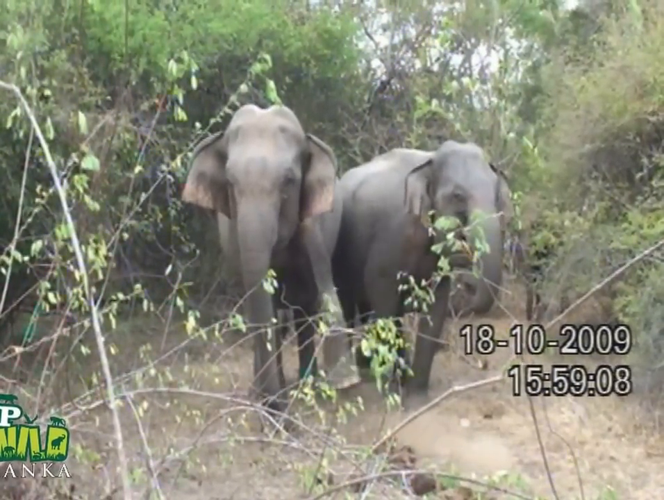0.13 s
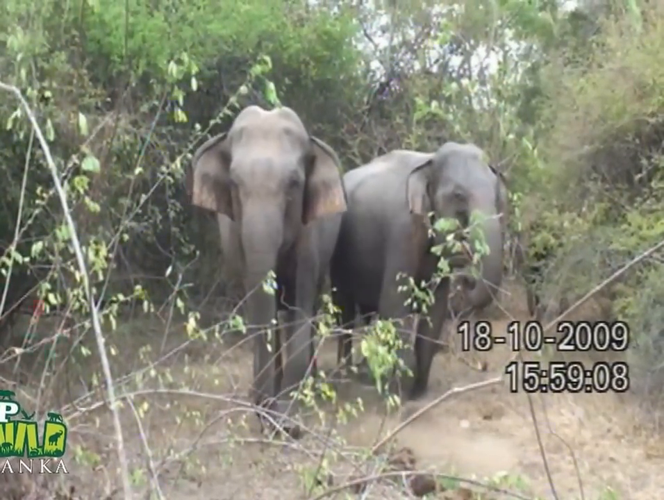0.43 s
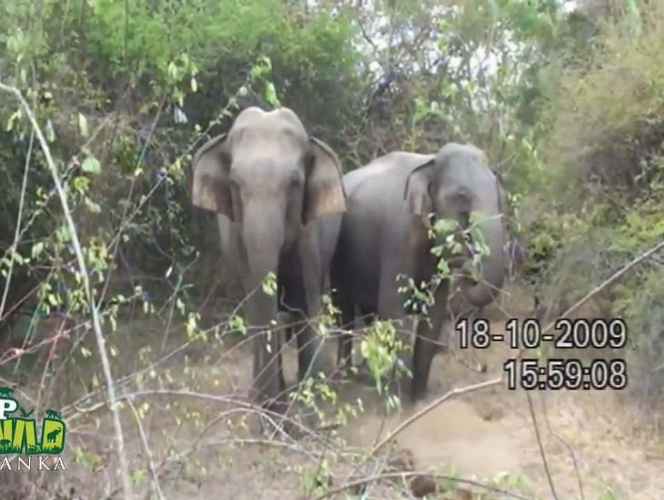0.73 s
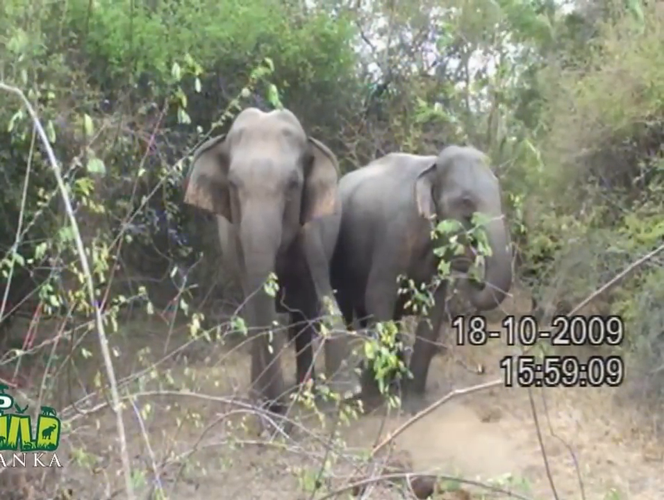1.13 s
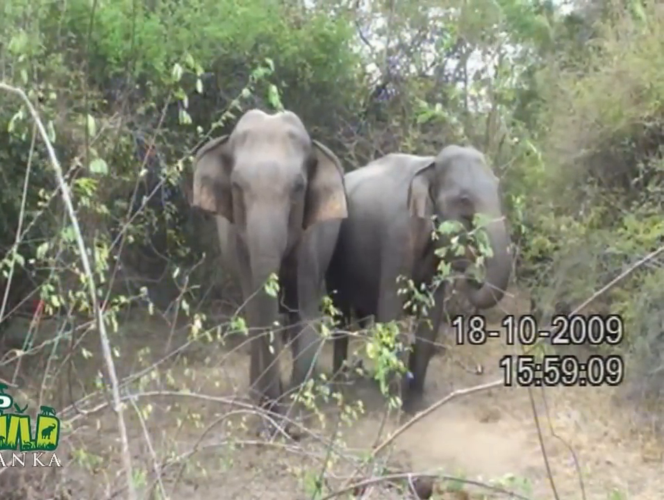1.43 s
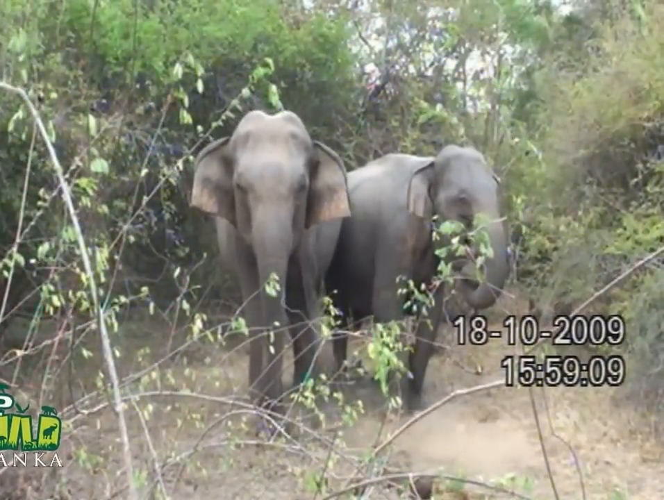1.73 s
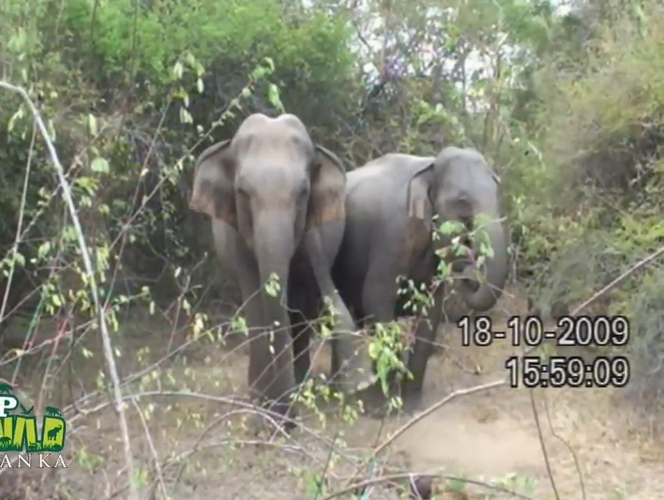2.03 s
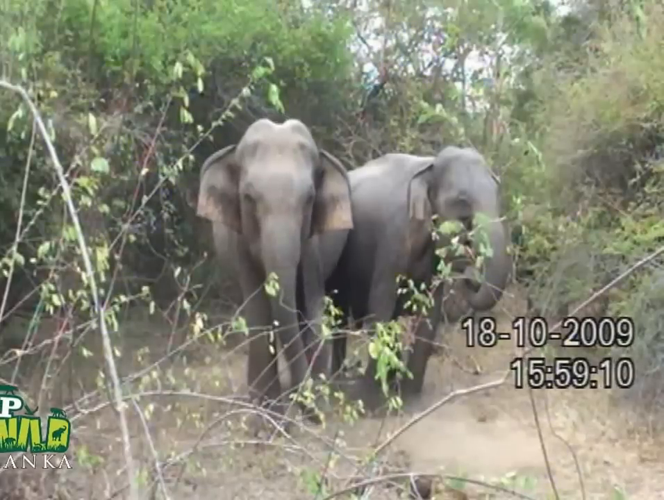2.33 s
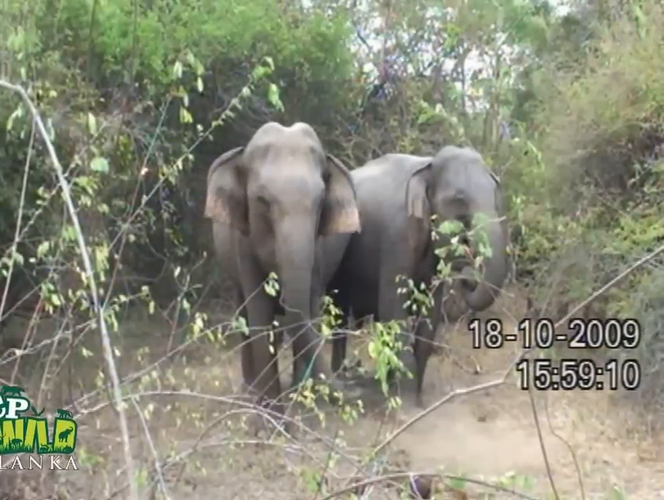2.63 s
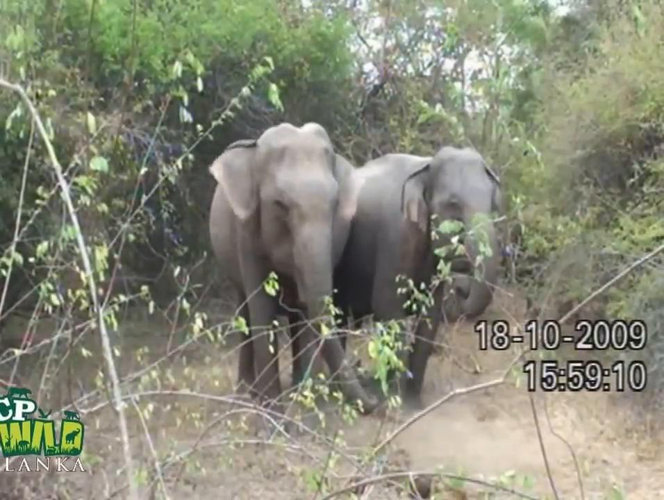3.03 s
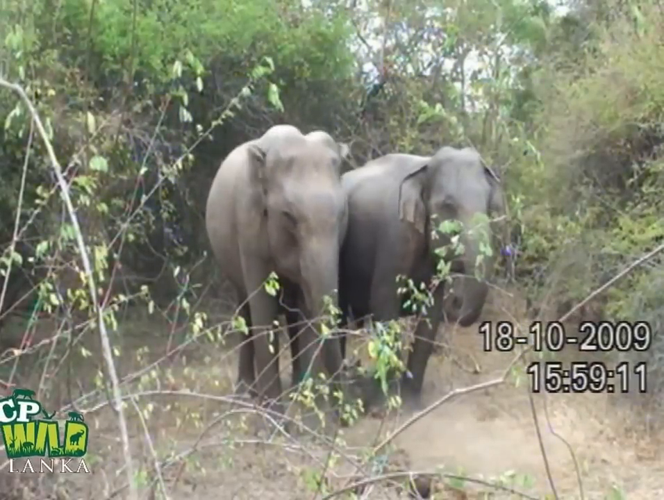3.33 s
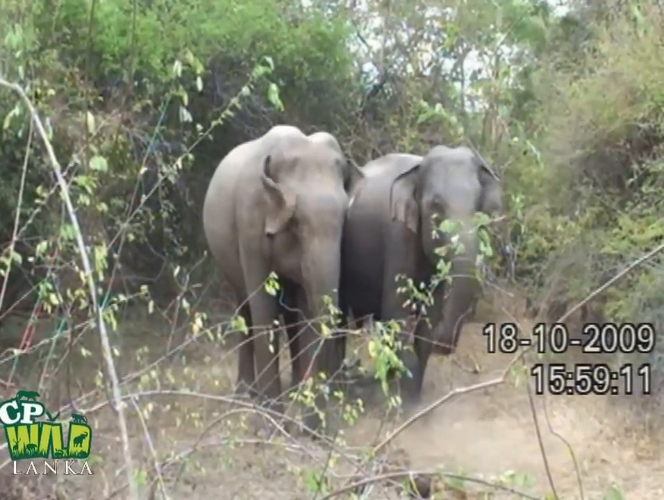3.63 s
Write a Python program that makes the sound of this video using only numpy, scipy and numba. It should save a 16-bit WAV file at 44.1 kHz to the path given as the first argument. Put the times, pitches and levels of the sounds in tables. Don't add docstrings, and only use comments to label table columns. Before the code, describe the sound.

An elephant is already roaring at the start, sliding briefly down in pitch, then locking into a clear, brassy, mid-pitched note at about 0.2-0.6 s. It roughens and wavers until 2 s, then becomes a throaty, rasping, crackling bellow. A faint note returns, peaking near 3.35 s, before sinking into a low, raspy groan to the end. Close, dry outdoor camcorder sound, with faint wind hiss and a barely audible companion's rumble.

```python
import sys
import numpy as np
from scipy import signal
from scipy.fft import rfft, irfft
from scipy.io import wavfile
from scipy.ndimage import uniform_filter1d
from numba import njit

SR = 44100
rng = np.random.default_rng(int(sys.argv[2]) if len(sys.argv) > 2 else 0)


def generate_wav(sig):
    pcm = np.round(np.clip(np.atleast_2d(sig).T, -1, 1) * 32767).astype(np.int16)
    wavfile.write(sys.argv[1], SR, pcm)


def gain_from_decibels(decibels):
    exponent = np.asarray(decibels, float) / 20
    return 10 ** exponent


N = 166257
T = np.arange(N) / SR
BINS_HZ = np.maximum(np.arange(N // 2 + 1) * SR / N, 10)


def curve(table):
    rows = np.array(table, float)
    return [np.interp(T, rows[:, 0], column) for column in rows.T[1:]]


def spectrum(table):
    rows = np.array(table, float)
    return [np.interp(np.log(BINS_HZ), np.log(rows[:, 0]), column) for column in rows.T[1:]]


def unit(x):
    return x / np.sqrt(np.mean(x ** 2))


def smooth_power(x, seconds):
    return np.sqrt(uniform_filter1d(x, int(seconds * SR)) + 1e-9)


@njit
def moving_bandpass(x, hz, width):
    y, band, low = np.empty(len(x)), 0., 0.
    for i in range(len(x)):
        g = np.tan(np.pi * hz[i] / SR)
        k = width / hz[i]
        v = (band + g * (x[i] - low)) / (1 + g * (g + k))
        band, low, y[i] = 2 * v - band, low + 2 * g * v, k * v
    return y


def ring(x, hz, width_hz):
    hz = hz * np.ones(N)
    once = moving_bandpass(x, hz, 1.65 * width_hz)
    return moving_bandpass(once, hz, 1.65 * width_hz)


def walk(rate_hz):
    k = max(int(SR / rate_hz), 2)
    x = uniform_filter1d(uniform_filter1d(rng.standard_normal(N), k), k)
    return unit(x - uniform_filter1d(x, 4 * k))


def tone(hz, db, orders, rough, strain=0):
    phase = 2 * np.pi * np.cumsum(hz * (1 + 0.059 * rough * walk(55.4))) / SR
    shake = np.maximum(1 + rough * walk(40), 0) / np.sqrt(1 + rough ** 2)
    stack = 0
    for k, partial_db in orders:
        wander_db = 2 * walk(21) * (k != 1)
        strain_db = strain * (k > 2) * db
        stack = stack + gain_from_decibels(partial_db + wander_db + strain_db) * np.sin(k * phase + k)
    return np.sqrt(2) * gain_from_decibels(db) * shake * stack


# frequency in Hz, level in dB.
SCRUB_COLOUR = [(25, -28), (60, -21.5), (120, -19.5), (1000, -8), (5000, -15), (13000, -22)]


def scrub():
    colour = gain_from_decibels(spectrum(SCRUB_COLOUR)[0])
    noise = rfft(rng.standard_normal((2, N))) * colour
    mid = irfft(noise[0], N)
    side = irfft(noise[1] / (1 + BINS_HZ / 3000), N)
    gust_db = 1.0 * walk(20)
    return gain_from_decibels(-46 + gust_db) * unit(mid + 0.2 * side * np.array([[1], [-1]]))


# time in seconds, pitch of the third partial in Hz, level in dB.
RUMBLE = [(0.0, 75.2, -26.5), (0.02, 70.7, -48), (0.46, 73.5, -50.5), (0.81, 85.4, -52.5),
          (1.23, 82.36, -51.5), (1.54, 79.8, -53), (1.86, 81.8, -51), (2.18, 67, -52.5), (2.5, 73.4, -44),
          (2.88, 72.3, -45.5), (3.14, 82.7, -39), (3.33, 78, -43.5), (3.71, 75.1, -43.5),
          (3.77, 84.3, -53.5)]
# multiple of the pitch, level in dB.
RUMBLE_PARTIALS = [(1, -18), (2, -7), (3, 1), (4, -19), (5, -20.5)]


def companion_rumble():
    third_hz, db = curve(RUMBLE)
    return tone(third_hz / 3, db, RUMBLE_PARTIALS, 0.05)


# time in seconds, pitch in Hz, level in dB.
SLIDE = [
    (0, 420, -16.5),
    (.03, 385, -20),
    (.09, 350, -17),
    (.12, 340, -44.5),
    (.15, 340, -70.5),
]


def slack_slide():
    return tone(*curve(SLIDE), [(1, 0)], 0.15)


# time in seconds, pitch in Hz, level in dB.
LATE_NOTE = [
    (2.6, 400, -60),
    (2.75, 400, -26),
    (2.97, 405, -25.5),
    (3.05, 402.2, -26),
    (3.17, 415, -18.5),
    (3.31, 436.3, -15),
    (3.37, 418, -11),
    (3.43, 404, -25),
    (3.62, 394, -44.5),
]


def late_note():
    return tone(*curve(LATE_NOTE), [(1, -2.5)], 0.3)


# time in seconds, pitch in Hz, level in dB.
GROAN = [
    (3.32, 214, -40),
    (3.35, 213, -14),
    (3.42, 200, -16),
    (3.61, 186, -16),
    (3.63, 150, -30),
    (3.67, 140, -24),
    (3.72, 160, -22),
    (3.77, 168, -21),
]
# multiple of the pitch, level in dB.
GROAN_PARTIALS = [(1, -5.5), (2, -14), (2.85, -11.5)]


def groan():
    return tone(*curve(GROAN), GROAN_PARTIALS, 0.12)


# time in seconds, pitch in Hz, level in dB.
NOTE = [(0, 404, -17.5), (.08, 420.2, -9), (.19, 413.3, -13), (.22, 422.2, -4), (.35, 423.4, -5),
        (.5, 429.5, -3), (.62, 426.7, -8.5), (.68, 416.8, -9.5), (.9, 416, -11), (.96, 404, -18.5),
        (1.2, 399.6, -22.5), (1.36, 410.2, -15.5), (1.49, 409, -8.5), (1.54, 401.2, -29),
        (1.66, 400, -10.5), (1.76, 394, -25.5), (1.93, 400, -19.5), (2.0, 388.6, -18.5)]
# time in seconds, roughness from 0 to 1.
NOTE_ROUGHNESS = [
    (0, .35),
    (.19, .35),
    (.22, .07),
    (.5, .07),
    (.64, .12),
    (.68, .3),
    (1.0, .4),
    (1.4, .18),
    (1.7, .2),
    (2.0, .5),
]
# multiple of the pitch, level in dB.
NOTE_PARTIALS = [(.5, -26.5), (1, -1), (1.5, -44.5), (2, -35), (3, -24), (4, -27), (5, -42.5), (7, -44.5)]


def trumpet_note():
    hz, db = curve(NOTE)
    rough = curve(NOTE_ROUGHNESS)[0]
    fade = np.clip((2.05 - T) / 0.14, 0, 1)
    return tone(hz, db, NOTE_PARTIALS, rough, strain=0.88) * fade


def slaps():
    rate_hz, jitter, puff_share = 213.84, 0.22, 0.7
    timing, force = rng.standard_normal((N // 60, 2)).T
    at = np.cumsum(SR / rate_hz * np.exp(jitter * timing)).astype(int)
    keep = at < N
    pulses = np.zeros(N)
    pulses[at[keep]] = gain_from_decibels(2.2 * force[keep])
    breath = signal.lfilter([1], [1, -np.exp(-rate_hz / puff_share / SR)], pulses)
    puff = breath * rng.standard_normal(N)
    return unit(pulses - pulses.mean()) + gain_from_decibels(-3) * unit(puff)


# time in seconds, peak in dB.
CRACKS = [(0.0832, -22), (0.199, -10), (0.6559, -29), (0.8666, -23), (0.9343, -27), (0.9552, -23),
          (1.0321, -14.5), (1.0809, -20), (1.1796, -21), (1.2843, -21.5), (1.338, -18.5), (1.3643, -23),
          (1.3833, -17), (1.5034, -22), (1.5409, -26), (1.6716, -17.5), (1.7295, -24), (1.756, -24),
          (1.7878, -15.5), (1.8346, -13.5), (1.8676, -11.5), (1.9654, -16.5), (1.9911, -23), (2.0246, -19),
          (2.0502, -17), (2.0896, -15), (2.1036, -22), (2.1251, -26), (2.165, -25), (2.1834, -16),
          (2.2629, -13.5), (2.3466, -20), (2.368, -17), (2.383, -14), (2.5241, -15), (2.5661, -21),
          (2.596, -24), (2.6599, -19.5), (2.6797, -24), (2.7147, -31), (2.7591, -20), (2.7686, -29),
          (2.8361, -16), (2.8735, -16), (2.9358, -14), (2.9741, -19.5), (3.0119, -16), (3.044, -12),
          (3.1293, -24), (3.1482, -23), (3.1634, -14.5), (3.1882, -19), (3.2622, -13), (3.315, -23),
          (3.3817, -29), (3.4078, -24)]


def crack_bursts():
    bursts = 0
    for start, peak_db in CRACKS:
        after = T - start - 0.002
        decay_s = np.where(after < 0, 0.001, 0.006)
        bursts = bursts + gain_from_decibels(min(peak_db, -15.5) + 25) * np.exp(-np.abs(after) / decay_s)
    return bursts


# time in seconds, level in dB, throat resonance in Hz, throat level in dB,
# rasp level in dB, mouth (0 open, 1 narrowed, 2 closing, 3 sunk).
ROAR = [(0, -12.5, 199.1, -10.5, -5.5, 0), (.19, -18, 209.4, -1.5, -8, -2),
        (.23, -24.5, 213.5, 1.5, -2.5, 0.5), (.45, -18, 213.8, -2.5, -0.5, 1),
        (.62, -24.5, 222.4, 2, -0.5, 0), (.68, -17.5, 225, -4.5, -1.5, 0.5), (1.1, -16.5, 235.9, -3, -2, 0),
        (1.72, -16, 237, -1, 0.5, 1.26), (1.78, -20.5, 238, 2.5, 4, 1.5), (2.1, -20, 230, 2.5, -1.5, 1),
        (2.5, -18.5, 236.3, 3, -2, 1), (2.93, -18.5, 217.4, 2, 1, 1), (3.1, -16, 212, -1, -6.5, 1),
        (3.32, -13.5, 210, 0, -4, 1.5), (3.4, -17.5, 208, 2.5, 2.5, 2), (3.6, -19, 186.1, -5, 1.5, 2.5),
        (3.64, -20, 151, -3, -10.5, 3), (3.77, -20, 168, -1, 3.5, 3)]
# time in seconds, stretch of the upper resonances as a ratio, their level in dB.
TRUNK = [(0, 0.87, -4), (.19, 1, -3), (.24, 1, 0), (.44, 1, -2), (.6, 1, 0), (.75, 1, -2), (2.7, 1, -1),
         (2.95, 1.005, -0.5), (3.08, 1.02, -4.5), (3.25, 1.035, -2.5), (3.36, .955, -2.5), (3.5, .99, 1),
         (3.62, .97, 8), (3.72, 1.2, -3), (3.76, 0.86, 9.5)]
# centre in Hz, width in Hz, level in dB
TRACT = [(400, 61, 3, 5, 2), (538.5, 51.7, -0.5, 0.5, 0), (611.8, 28.6, 3.5, -2, -2),
         (734.5, 120, -9.5, -12.5, -7), (987, 78, -11.5, -16, -15), (1212.4, 70.4, -8, -5, -12.5),
         (1551, 40, -7, -33.5, -22.5), (1691, 55, -20, -19, -23.5), (1984, 159, -19.5, -14.5, -25.5),
         (2458, 87, -25, -28.5, -18.5), (2696, 100, -23, -29.5, -16.5), (3057, 120, -26.5, -26, -30.5),
         (3406, 140, -27, -32.5, -38), (4005, 110, -23, -23, -24.5),
         (4780, 120, -47, -34, -35), (5490, 78, -44, -44, -26.5), (6304, 91, -37, -32.5, -31),
       (7860, 640, -43, -46, -42), (10250, 1200, -55, -46, -56), (11680, 220, -47, -41.5, -52),
       (3030, 2350, -36.5, -34, -34.5)]


def roar():
    db, throat_hz, throat_db, rasp_db, mouth = curve(ROAR)
    stretch, trunk_db = curve(TRUNK)
    sunk = np.clip(mouth - 2, 0, 1)
    source = slaps() * gain_from_decibels(0.6 * walk(80.4))
    cracks = crack_bursts()
    rasp = source * gain_from_decibels(0.5 * walk(68.5)) * (1 + 0.19 * cracks) + cracks * rng.standard_normal(N)

    tract = 0
    for k, (hz, width_hz, *shape_db) in enumerate(TRACT):
        in_rasp, in_trunk = hz > 1400, hz > 2900
        trunk_share = in_trunk + 0.9 * (1100 < hz < 1400)
        sunk_db = -12 if hz > 2600 else 5 * (650 < hz < 1400)
        gain_db = np.interp(mouth, range(3), shape_db) + in_rasp * rasp_db
        gain_db = gain_db + trunk_share * trunk_db + sunk_db * sunk
        shift = stretch if in_trunk and hz < 7000 else 1 - 0.075 * sunk
        sign = (-1) ** k
        tract = tract + sign * gain_from_decibels(gain_db) * ring(rasp if in_rasp else source, hz * shift, width_hz)

    throat = unit(ring(source, throat_hz * (1 + 0.011 * walk(6.7)), 50))
    throat = throat + tone(throat_hz, 1.5, [(1, 0.011)], 0.4)
    tract = tract / np.std(ring(source, 460.0, 473.0))
    return gain_from_decibels(db + 2.5) * tract + gain_from_decibels(db + throat_db - 5.5) * throat


# centre in Hz, width in Hz, change in dB.
DIPS = [(124, 34, -1.5), (311.5, 7.6, -7), (897, 20.7, -20.5), (1335, 190, -4.5), (2775, 24, -21),
        (3850, 44, -3), (4500, 90, 3.5)]


def ground_bounce(x):
    dips_db = sum(db * np.exp(-((BINS_HZ - hz) / width_hz) ** 2) for hz, width_hz, db in DIPS)
    return irfft(rfft(x) * gain_from_decibels(dips_db), N)


# frequency in Hz, lead of the left in radians, left over right in dB.
PORTS = [(80, -0.42, 1), (250, 0.13, -4.5), (597, 0.81, -2.5), (1000, .6, 3.5), (1230, -0.93, 1),
         (1602, 0.27, -3.5), (3800, 0.2, -3), (7000, 0.53, 0.5)]


def at_ports(voice):
    lead, left_db = spectrum(PORTS)
    half = np.array([[0.5], [-0.5]])
    return irfft(rfft(voice) * np.exp(1j * lead * half) * gain_from_decibels(left_db * half), N)


def bushes(voice):
    size = 4000
    tail = rng.standard_normal((2, size)) * np.exp(-np.arange(size) / SR / 0.0052)
    middle = moving_bandpass(voice, 2200 * np.ones(N), 4100.0)
    return signal.fftconvolve(middle[None], unit(tail) / np.sqrt(size), axes=1)[:, :N]


def scene():
    voice = trumpet_note() + slack_slide() + late_note() + groan()
    voice = voice + ground_bounce(roar()) + companion_rumble()
    loud = smooth_power(voice ** 2, 0.1)
    duck = np.minimum(1, gain_from_decibels(-10) / loud) ** 1.6
    return at_ports(voice) + gain_from_decibels(-9) * bushes(voice) + scrub() * duck


def squeeze(x):
    loud = smooth_power(np.mean(x ** 2, 0), 0.012)
    gain = np.minimum(1, gain_from_decibels(-14) / loud) ** 0.4
    return np.clip(x * gain * gain_from_decibels(3.5), -0.96, 0.96)


def lose_top(x):
    rough = curve(NOTE_ROUGHNESS)[0]
    clear = np.clip((0.17 - rough) / 0.04, 0, 1) * np.clip(0.8 - 0.3 * walk(8), 0, 1)
    top = signal.sosfiltfilt(signal.butter(8, 7400, "high", fs=SR, output="sos"), x)
    return x - top * (1 - gain_from_decibels(-22 * clear))


def line_whistle():
    return np.sqrt(2) * gain_from_decibels(-72) * np.sin(2 * np.pi * 15625 * T)


def top_cut(x):
    return signal.sosfilt(signal.butter(12, 20000, fs=SR, output="sos"), x)


def record(dry):
    x = squeeze(dry)
    x = signal.sosfilt(signal.cheby1(8, 1, 13300, fs=SR, output="sos"), x)
    x = lose_top(x) + line_whistle()
    return top_cut(x)


dry = scene()
out = record(dry)
generate_wav(out)
```